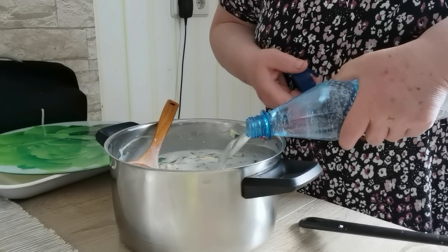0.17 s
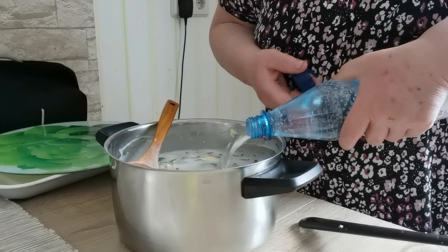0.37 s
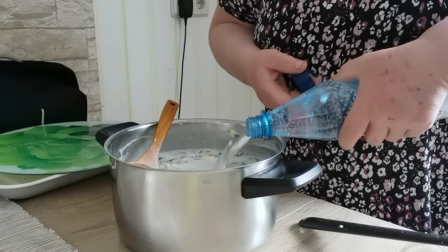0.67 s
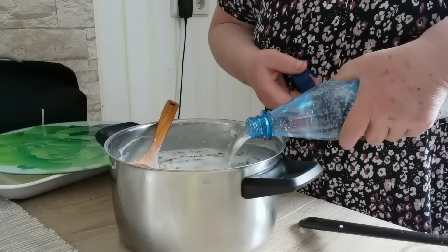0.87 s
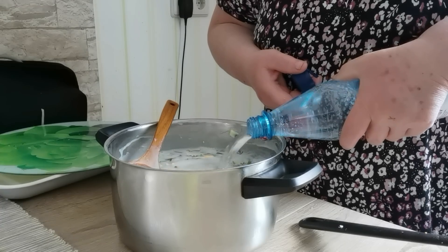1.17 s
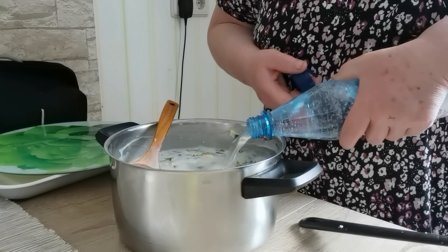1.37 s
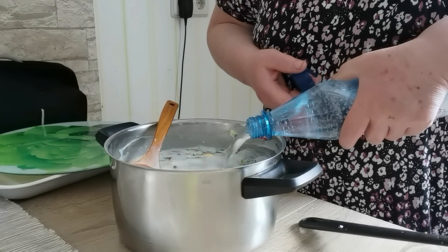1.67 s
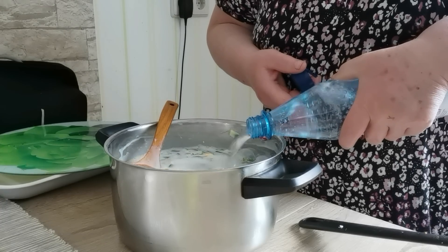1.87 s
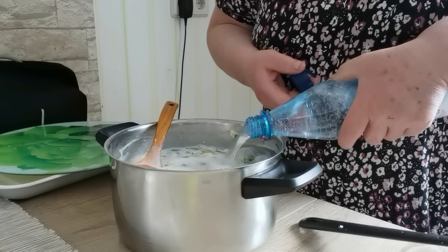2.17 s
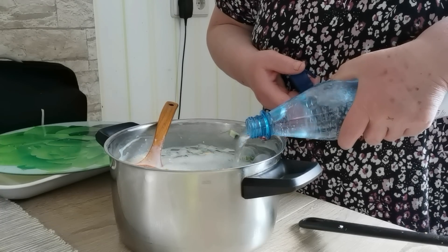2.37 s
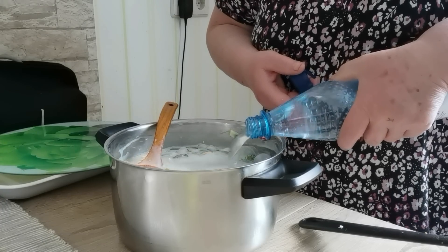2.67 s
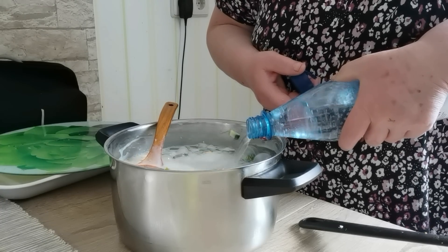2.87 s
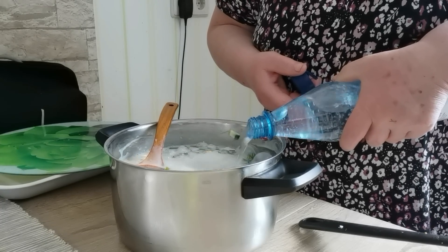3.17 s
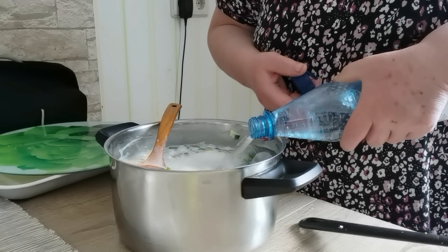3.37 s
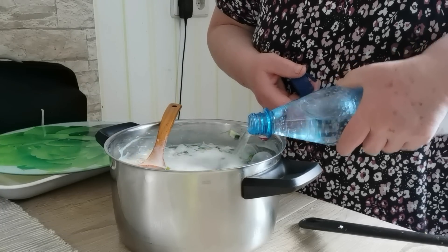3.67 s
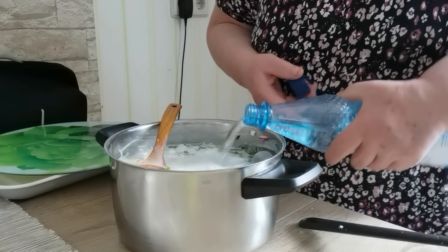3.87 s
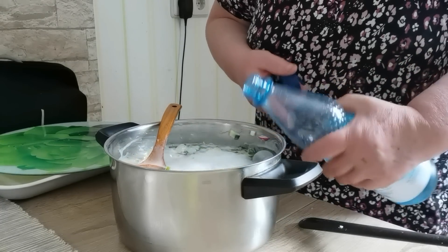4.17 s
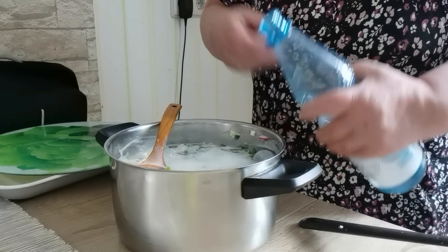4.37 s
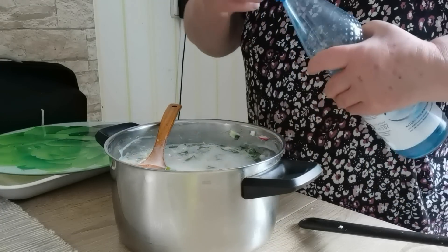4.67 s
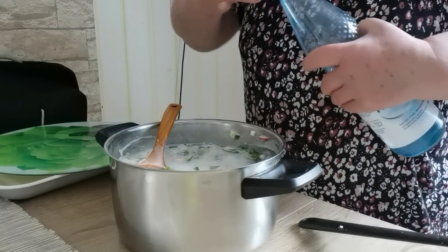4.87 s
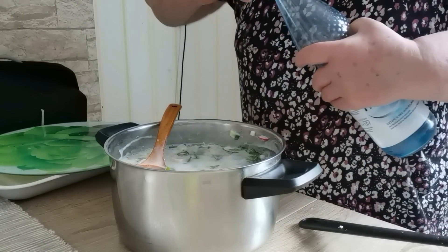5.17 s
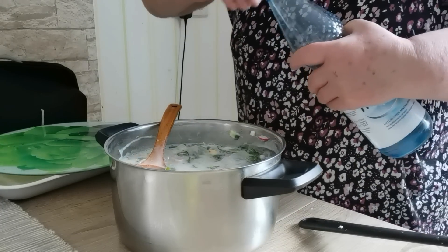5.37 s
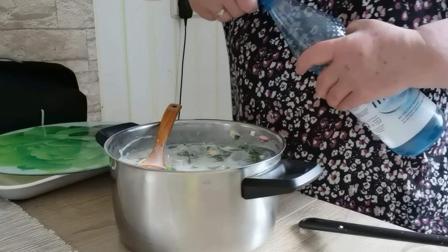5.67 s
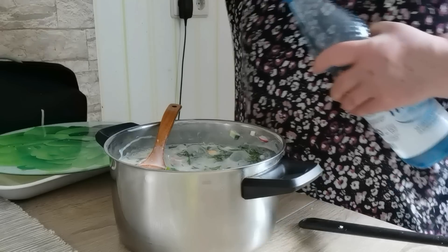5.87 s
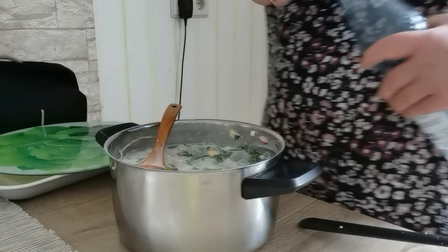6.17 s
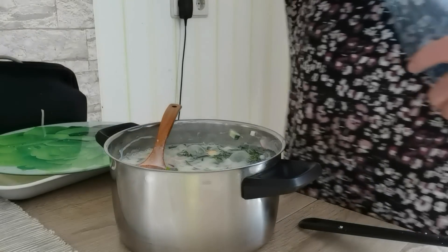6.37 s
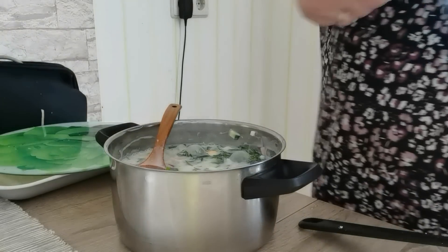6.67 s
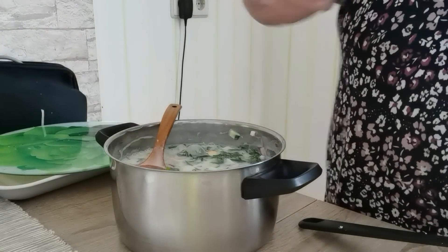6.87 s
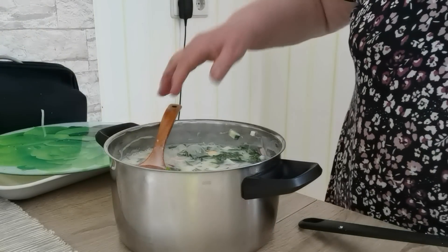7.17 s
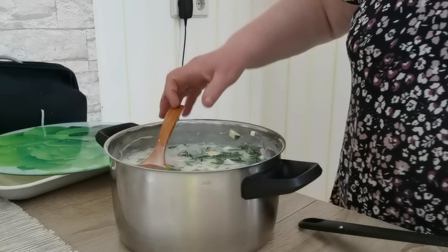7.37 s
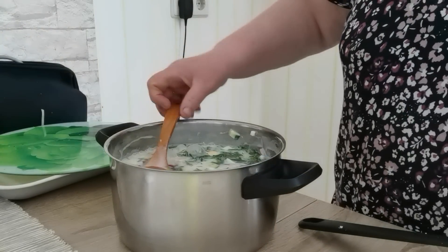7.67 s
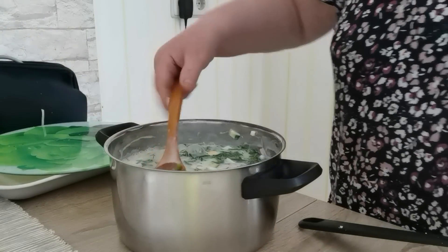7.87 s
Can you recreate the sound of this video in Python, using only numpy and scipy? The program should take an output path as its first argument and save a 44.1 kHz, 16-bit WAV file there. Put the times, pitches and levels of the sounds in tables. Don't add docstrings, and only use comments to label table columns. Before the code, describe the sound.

A close stereo microphone hears hollow, rounded glugs with tiny bubbling and a steady airy hiss. After the pour the fizz thins while thin plastic snaps sharply and a screw cap ticks and rasps in short strokes. Scuffing steps follow, then one woody cupboard thud with high ringing and a dull spoon knock, all with short room echoes over a quiet low hum.

```python
import sys
import numpy as np
from scipy import signal
from scipy.fft import rfft, irfft, next_fast_len
from scipy.io import wavfile
from scipy.ndimage import map_coordinates

SR = 44100
rng = np.random.default_rng(int(sys.argv[2]) if len(sys.argv) > 2 else 0)


def field_ratio(decibels):
    return 10 ** (np.asarray(decibels, dtype=float) / 20)


def store_pcm(level_fs):
    pcm = np.round(np.clip(level_fs, -1, 1) * 32767).astype(np.int16)
    wavfile.write(sys.argv[1], SR, np.atleast_2d(pcm).T)


N = 354123
T = np.arange(int(.75 * SR)) / SR
BUILD_S = 0.95


def unit(x):
    return x / np.sqrt(np.mean(x ** 2) + 1e-20)


def along(points, hz):
    f, value = np.transpose(points)
    return np.interp(np.log(hz + 1), np.log(f + 1), value)


def wobble(rate):
    knots = rng.standard_normal(int(N * rate / SR) + 4)
    return map_coordinates(knots, [np.arange(N) * rate / SR])


def filtered(x, response):
    m = next_fast_len(x.shape[-1] + 8192)
    return irfft(rfft(x, m) * response(np.fft.rfftfreq(m, 1 / SR)), m)[..., :x.shape[-1]]


def lowpass2(corner_hz):
    return lambda f: 1 / (1 + 1j * f / corner_hz) ** 2


def resonances(modes):
    def response(f):
        total = 0
        for k, (centre, width, db) in enumerate(modes):
            damping = 1j * f * width
            total = total + (-1) ** k * field_ratio(db) * damping / (centre ** 2 - f ** 2 + damping)
        return total
    return response


def blip(hz, cycles, rise=0):
    u = T * hz
    shape = np.exp(-u / cycles) * (1 - np.exp(-u / (0.058 * cycles))) * (u < 8 * cycles)
    return np.sin(2 * np.pi * u * (1 + rise * u / cycles)) * shape / shape.max()


def snap(ms):
    x = rng.standard_normal(len(T)) * np.exp(-T * 1000 / ms)
    return x / np.abs(x).max()


# (frequency [Hz], left-right correlation)
LIKENESS = [(40, 0), (100, 0.75), (300, 0.72), (650, 0.48), (1400, 0.054)]


def pair(n):
    def mid_side(hz):
        angle = np.arccos(np.clip(along(LIKENESS, hz), -1, 1)) / 2
        return np.array([np.cos(angle), np.sin(angle)])

    mid, side = filtered(rng.standard_normal((2, n)), mid_side)
    return np.array([mid + side, mid - side])


# (frequency [Hz], reverberation time t60 [s])
WALL_DECAY = [(60, 0.059), (120, 0.52), (2000, 0.47), (6000, 0.4), (9000, 0.33), (14000, 0.73)]
# (frequency [Hz], level [dB], t60 [s])
ROOM_MODES = [(124, 0.5, 0.51), (203, 2, 0.47), (261.4, 1, 0.3), (307.4, 3, 0.18), (351, 0.5, 0.18),
              (400, -8.5, 0.38)]


def echoes(wet_db, lag):
    hz, t, z = signal.stft(pair(len(T)), SR, nperseg=512)
    decay = field_ratio(-60 * t / along(WALL_DECAY, hz)[:, None])
    tail = signal.istft(z * decay, SR, nperseg=512)[1][:, :len(T)]
    density = (1 - np.exp(-T / 0.00025)) * (1 + 0.29 * np.exp(-T / 0.04))
    tail = filtered(tail * density, lambda f: 1j * f / (70 + 1j * f) * lowpass2(5500)(f))
    modes = 0
    for mode_hz, db, t60 in ROOM_MODES:
        envelope = field_ratio(db + rng.normal(0, 1) - 60 * T / t60)
        modes = modes + envelope * np.sin(2 * np.pi * mode_hz * T + rng.normal(0, 1))
    answer = field_ratio(wet_db) * (tail + field_ratio(-21.0) * modes) / np.linalg.norm(tail[0])
    direct = np.arange(len(T)) == np.array([[max(lag, 0)], [max(-lag, 0)]])
    return answer + direct


def add(out, s, sound, wet_db, lag):
    heard = signal.fftconvolve(sound[None], echoes(wet_db, lag), axes=1)
    spot = out[:, round(s * SR):][:, :heard.shape[1]]
    spot += heard[:, :spot.shape[1]]


# (frequency [Hz], level [dB])
HUM_LINES = [(48.4, -63.5), (145.3, -70), (199.2, -66.5), (247.6, -83), (317.6, -76), (430.7, -84),
             (489.9, -91), (694.4, -76)]
# (frequency [Hz], level per Hz [dB])
RUMBLE_SPECTRUM = [(15, -39), (25, -8), (97, -3.5), (316, -8), (375, -18.5), (422, -16.5), (626, -17),
                   (694, -14.5), (882, -22.5), (1500, -28.5), (1950, -39), (3300, -120)]


def fridge():
    t = np.arange(N) / SR
    lines = 0
    for hz, db in HUM_LINES:
        level = field_ratio(db + 0.5 + 0.57 * wobble(3.84))
        lines = lines + level * np.sin(2 * np.pi * hz * t + 0.39 * wobble(3.9))
    rumble = unit(filtered(pair(N), lambda hz: field_ratio(along(RUMBLE_SPECTRUM, hz))))
    return lines + field_ratio(-64.0) * rumble


def fizz():
    level_db, start_db, pour_end_s, sag_db, sag_s = -57, -2.5, 4.5, -5.5, 0.88
    t = np.arange(N) / SR
    build = start_db * np.exp(-t / BUILD_S)
    thinning = sag_db * (1 - np.exp(-(t - pour_end_s).clip(0) / sag_s))
    specks = field_ratio(0.96 * wobble(400) + 0.18 * wobble(20))
    hiss = filtered(rng.standard_normal((2, N)) * specks, lambda hz: hz ** 4 / (hz ** 4 + 1400.0 ** 4))
    return field_ratio(level_db + build + thinning) * unit(hiss)


def stream():
    level_db, middle_hz, pitch_step, cycles = -73.5, 1730, 0.0974, 7
    births_per_s, end_s, fade_db_per_s = 120, 5.2, 6
    t = np.arange(N) / SR
    flow_db = -fade_db_per_s * (t - end_s).clip(0) - 7 * np.exp(-t / BUILD_S)
    flow_db = flow_db + 1.5 * wobble(2.63) + 1.6 * wobble(24)
    births = (rng.random((7, 2, N)) < births_per_s / SR) * rng.standard_normal((2, N))
    pitches = middle_hz * np.exp(pitch_step * np.arange(-3, 4))
    notes = np.array([blip(hz, cycles, rise=.02)[:SR // 15] for hz in pitches])
    ringing = signal.fftconvolve(births, notes[:, None], axes=2)[..., :N].sum(0)
    return field_ratio(level_db + flow_db) * unit(ringing)


# (time [s], peak [dB], pitch [Hz], decay [cycles], room [dB])
SHORT_RINGS = [(.08, -64, 853, 9.3, -10), (.858, -60, 1010, 3.2, 5.5), (.89, -67, 1290, 4, 5),
               (1.9693, -35, 5920, 27, 5), (2.0, -63, 783, 10, 4.5), (2.17, -62.5, 900, 4.5, 7),
               (4.252, -47, 3200, 17, -4), (4.26, -62.5, 400, 7.1, -3), (6.095, -37.5, 4700, 9.9, 5),
               (6.115, -49, 4760, 11, 0), (6.535, -47.5, 1280, 15, 5), (4.895, -57, 175.8, 10.1, -2),
               (1.05, -69, 743, 8.5, -3), (4.32, -59, 780, 5.7, -6), (6.566, -42.5, 1490, 7, 1),
               (7.459, -28, 9600, 20, 12.5), (7.476, -27, 9670, 16, 11.5), (7.589, -33, 203, 3.9, -3.5)]


def pops():
    out = np.zeros((2, N))
    for s, db, hz, cycles, wet_db in SHORT_RINGS:
        ring = blip(hz, cycles, rise=0.03)[:SR // 3]
        add(out, s, field_ratio(db) * ring / field_ratio(along(PORT_RESPONSE, hz)), wet_db, lag=-4)
    return out


# (time [s], peak [dB], bubble pitch [Hz], neck ring [dB], splash [dB])
NECK_BUBBLES = [(0.153, -45.5, 257, -9, -24), (0.38, -47, 204, -11.5, -22), (0.663, -46.5, 210, -8.5, -24),
                (0.926, -45.5, 215, -10, -22), (1.183, -48.5, 200, -15.5, -22),
                (1.448, -47, 213, -7.5, -22), (1.733, -47.5, 214, -12, -22), (1.967, -48.5, 218, -8.5, -22),
                (2.247, -40, 213, -20, -24), (2.257, -40.5, 268, -6, 7.5), (2.527, -40.5, 267, -7, -24),
                (2.796, -42, 283, -10, -20), (3.06, -51, 182.7, -10, -22), (3.086, -44.5, 270, -8, -30),
                (3.33, -53.5, 151, -9, -22), (3.36, -37, 268, -6, -16), (3.6, -52, 253, -9, -22),
                (3.631, -37, 268, -4.5, -1.5), (3.9, -43.5, 180, -14, -19), (4.248, -61.5, 188, -4, -20)]
# (frequency [Hz], width [Hz], level [dB])
BOTTLE_MODES = [(328, 188, 5.5), (433, 260, -1.5), (546, 96, 0), (783, 80, 2.5), (900, 39, -3),
                (1500, 270, -13)]


def glugs():
    churn_db, churn_ms, bubble_cycles = -9.5, 73, 2.22
    bottle = resonances(BOTTLE_MODES)
    out = np.zeros((2, N))
    for s, db, hz, neck_db, splash_db in NECK_BUBBLES:
        pinch = filtered(0.26 * snap(1.14) + (T == 0), lowpass2(1100))
        jolt = filtered(pinch, bottle)
        splash = filtered(snap(16), lambda f: lowpass2(2200)(f) * 1j * f / (900 + 1j * f))
        suck = -field_ratio(1) * blip(1.36 * hz, 0.3)
        bubble = -field_ratio(-8.0) * blip(hz, bubble_cycles, rise=0.0047)
        turbulence = snap(churn_ms) * field_ratio(5.8 * wobble(62)[:len(T)]) * (1 - np.exp(-T / 0.0056))
        churn = filtered(turbulence, lambda f: bottle(f) * lowpass2(1300)(f))
        sound = suck + bubble + field_ratio(neck_db + 3.0) * jolt / jolt.max() + field_ratio(splash_db) * splash
        sound = sound + field_ratio(neck_db + churn_db) * churn / churn.max()
        slap_back = field_ratio(-15.0) * np.roll(sound, round(.077 * SR))
        add(out, s + .0025, field_ratio(db + 5) * (sound + slap_back)[:SR // 3], wet_db=-2.5, lag=-4)
    return out


# (time [s], peak [dB], room [dB])
WALL_CRACKS = [(2.545, -48, -6), (2.8, -36, 3), (3.0916, -33.5, -4), (3.489, -37, 0), (3.631, -39, 3),
               (4.255, -31.5, -8), (4.7919, -23, -3), (5.065, -45, -4), (5.947, -38, -8),
               (5.9842, -33.5, -6), (5.996, -36, -10)]
# (time [s], peak [dB], pitch [Hz], wide snap [dB], room [dB])
CONTACTS = [(4.1984, -45, 4570, -19, 6), (4.8932, -43, 2880, 3, 5.5), (4.9045, -37.5, 3500, -10, -2),
            (5.0294, -43.5, 2820, 3, 2), (5.0591, -35, 2820, 5.5, -3.5), (5.1813, -25, 4670, 1, 2.5),
            (5.1931, -45, 1790, -19, -6), (5.2117, -31, 3180, -8, -9), (5.3015, -34.5, 5300, 2, 12),
            (5.3168, -17.5, 4540, 5, -8.5), (5.4685, -39, 1360, 10, -17), (5.519, -22.5, 1830, 2.5, -2.5),
            (5.5461, -22.5, 1600, 3.5, -6), (5.9242, -41.5, 1250, -22, 3.5), (6.0939, -24, 1590, -6, -2),
            (6.1083, -32, 1370, -4, 0), (6.147, -29.5, 1400, 10, -18), (6.4042, -46, 1650, -17, -32),
            (6.4963, -31.5, 1390, -14, -5), (6.6508, -21.5, 4900, 2.5, -18)]


def ticks():
    wall_hz, wall_cycles, wall_snap_db = 9100, 5.1, -1.5
    contact_cycles, crack_top_hz = 1.29, 8600
    rows = [(s, db, wall_hz, wall_cycles, wall_snap_db, wet_db) for s, db, wet_db in WALL_CRACKS]
    rows += [(s, db, hz, contact_cycles, snap_db, wet_db) for s, db, hz, snap_db, wet_db in CONTACTS]
    out = np.zeros((2, N))
    for s, db, hz, cycles, snap_db, wet_db in rows:
        ring = blip(hz, cycles) / field_ratio(.7 * along(PORT_RESPONSE, hz))
        crack = filtered(snap(1.4), lambda f: (1j * f / (0.16 * hz + 1j * f)) ** 2 * lowpass2(crack_top_hz)(f))
        add(out, s + .0005, field_ratio(db) * (ring + field_ratio(snap_db) * crack)[:SR // 20], wet_db, lag=3)
    return out


# (time [s], peak [dB], pitch [Hz], decay [cycles])
SOFT_CONTACTS = [(3.739, -52.5, 125, 2.3), (3.809, -58, 61, 2.5), (3.84, -44.5, 121, 1.7),
                 (3.93, -37.5, 148, 0.6), (3.97, -50, 177, 3.3), (4.029, -55, 177, 2.3),
                 (4.892, -48, 171, 0.59), (5.198, -48.5, 143, 4.4), (5.303, -40.5, 271, 1.25),
                 (5.544, -36.5, 130, 0.75), (5.924, -36.5, 140, 0.34), (6.119, -49, 124, 1.2),
                 (6.399, -54, 224, 0.87), (6.749, -72, 206, 9), (7.329, -43.5, 135, 0.35),
                 (7.924, -48.5, 164, 0.97), (7.928, -34.5, 222, 0.45), (7.977, -46, 131, 3.3),
                 (5.058, -48.5, 607, 4.3), (5.097, -53, 630, 2.7), (5.544, -39.5, 568, 4.2),
                 (5.599, -37, 654, 1.7), (6.199, -38, 715, 1.3), (7.049, -72, 443, 7.8),
                 (7.219, -61, 433, 5.6), (7.299, -55.5, 443, 4.1), (7.925, -49.5, 430, 1.7),
                 (7.966, -55.5, 419, 2.9)]


def bumps():
    out = np.zeros((2, N))
    for s, db, hz, cycles in SOFT_CONTACTS:
        push = blip(hz, max(cycles, .4)) * (1 - np.exp(-T / 0.00058))
        add(out, s, field_ratio(db) * push[:SR // 4], wet_db=-1.0, lag=3)
    return out


# (time of full pressure [s], level [dB], rise [s], hold [s], brightness [dB])
STROKES = [(4.234, -73, 0.1, 0.13, 17), (5.053, -50.5, 0.019, 0.0046, -7), (5.181, -39, .02, 0.0041, -6.5),
           (5.312, -41.5, 0.012, 0.0037, 1.5), (5.34, -51.5, 0.025, 0.15, -8),
           (5.538, -32.5, 0.026, 0.0029, -9.5), (5.573, -59, 0.027, 0.015, -9),
           (5.923, -50, 0.025, 0.19, -8.5), (6.086, -39, 0.033, 0.052, -10), (6.141, -53, .05, 0.03, 3),
           (6.409, -59, .015, 0.064, -7), (6.558, -41, 0.11, 0.045, -20), (6.611, -44, 0.15, 0.036, 3.5)]
# (frequency [Hz], width [Hz], level [dB])
RUBBED_MODES = [(594, 99, 4.5), (1510, 390, 9), (3330, 1380, 2)]


def rubs():
    rise_db, release_db_per_s = 41, 369
    grains = rng.standard_normal(N) * field_ratio(4 * wobble(220) + 1.2 * wobble(40))
    body = unit(filtered(grains, resonances(RUBBED_MODES)))
    fine_grains = rng.standard_normal(N) * field_ratio(1.5 * wobble(150))
    hiss = unit(filtered(fine_grains, lambda hz: hz / (hz + 3000) / (1 + (hz / 15000) ** 2)))
    t = T[:SR // 2]
    out = np.zeros((2, N))
    for s, db, rise, hold, bright_db in STROKES:
        start = round((s - rise) * SR)
        pressure_db = db - rise_db * (1 - t / rise).clip(0)
        pressure_db = pressure_db - release_db_per_s * (t - rise - hold).clip(0)
        friction = body[start:][:len(t)] + field_ratio(bright_db + 2.0) * hiss[start:][:len(t)]
        add(out, s - rise, field_ratio(pressure_db - 11.5) * friction, wet_db=4.0, lag=6)
    return out


# (time [s], swing rate [Hz])
DOOR_SLAM = (7.4235, 87.5)
FRAME_KNOCKS = [8.5, -8.5, -3.5, -1.5, -6.5]
# (frequency [Hz], width [Hz], level [dB])
DOOR_MODES = [(234, 140, 10), (362, 80, -21), (490, 120, -31.5), (840, 280, -1.5), (1220, 246, 1.5),
              (1720, 640, -6), (2640, 360, -12)]


def cupboard():
    out, knocks = np.zeros((2, N)), np.zeros(SR // 8)
    start, swing_hz = DOOR_SLAM
    t = T[:len(knocks)]
    knock_s = (np.arange(len(FRAME_KNOCKS)) - .38).clip(0) / swing_hz
    knocks[np.round(knock_s * SR).astype(int)] = -field_ratio(np.array(FRAME_KNOCKS))
    knock = filtered(knocks, resonances(DOOR_MODES))
    panel = np.sin(2 * np.pi * swing_hz * t + .4) * np.exp(-(t / .042) ** 4)
    rattle = filtered(snap(52)[:len(t)] * (1 - np.exp(-t / .006)), lowpass2(2600))
    air_push = blip(110, .5)[:SR // 20]
    add(out, start, field_ratio(-11.5) * knock / knock.max() + field_ratio(-14.5) * rattle, wet_db=2.5, lag=12)
    add(out, start, field_ratio(-12.0) * panel, wet_db=-8.5, lag=12)
    add(out, start - .0045, field_ratio(-29) * air_push, wet_db=-9, lag=12)
    return out


def scene():
    steady = fridge() + fizz() + stream()
    water = pops() + glugs()
    handling = ticks() + bumps() + rubs() + cupboard()
    return steady + water + handling


# (frequency [Hz], level [dB])
PORT_RESPONSE = [(1000, -2.5), (1500, -1.5), (2800, -0.5), (3400, -4.5), (4300, -2), (5500, 5), (7500, -7),
                 (8400, 6), (9100, 14.5), (10500, 4.5), (15500, -3)]
# (frequency [Hz], left over right [dB])
PORT_BALANCE = [(500, 0.5), (1500, 0), (4000, 2.5), (9000, 3.5), (15000, 9)]


def ports(hz):
    colour = field_ratio(along(PORT_RESPONSE, hz) + along(PORT_BALANCE, hz) * np.array([[.5], [-.5]]))
    bass_cut = (1j * hz / (35 + 1j * hz)) ** 2
    top_cut = 1 - .97 * (hz > 15870)
    return colour * bass_cut * top_cut


def band_limit(x):
    return signal.sosfilt(signal.butter(12, 16800, fs=SR, output="sos"), x)


def record(dry):
    mix = filtered(dry, ports)
    return band_limit(mix)


dry = scene()
out = record(dry)
store_pcm(out)
```